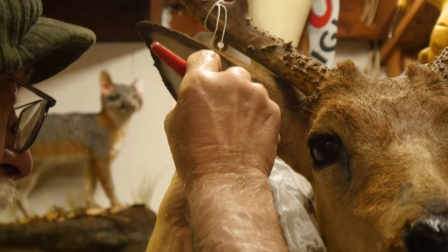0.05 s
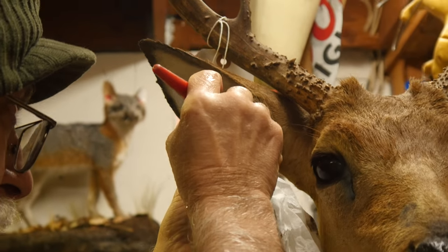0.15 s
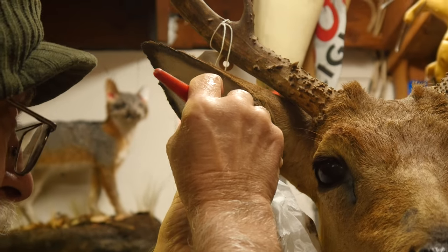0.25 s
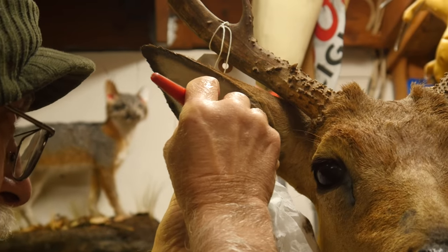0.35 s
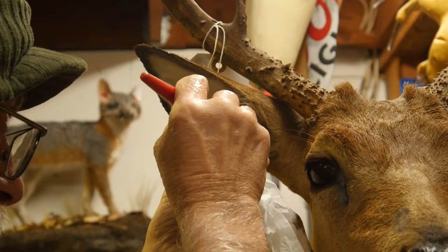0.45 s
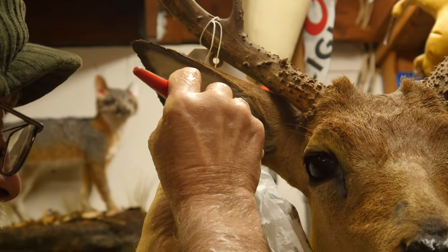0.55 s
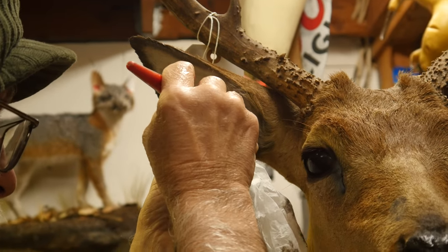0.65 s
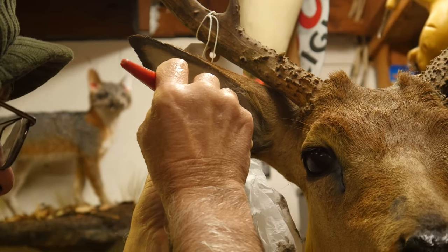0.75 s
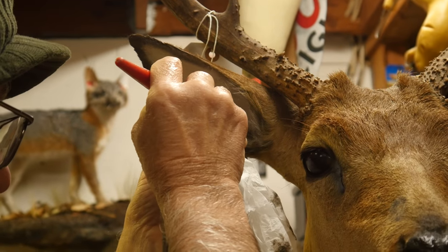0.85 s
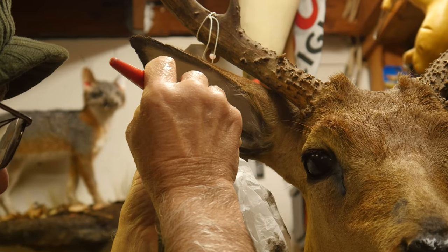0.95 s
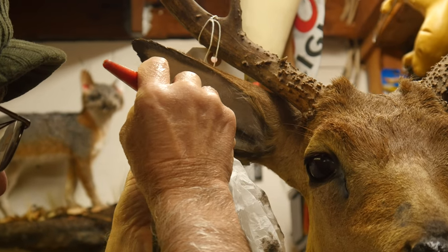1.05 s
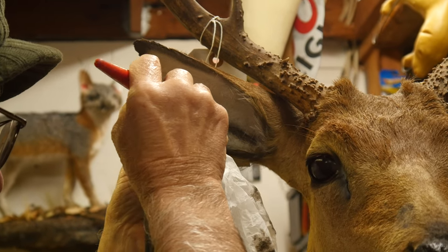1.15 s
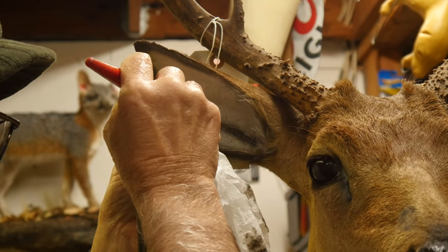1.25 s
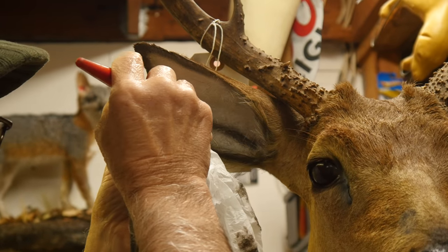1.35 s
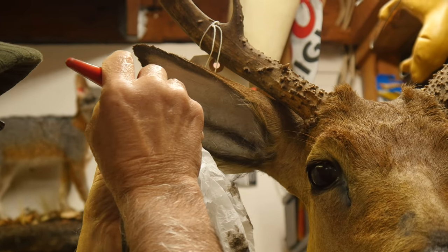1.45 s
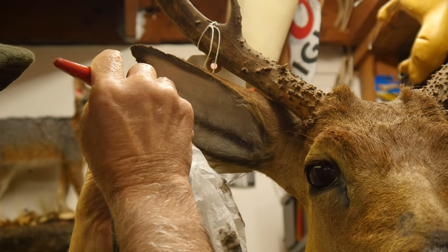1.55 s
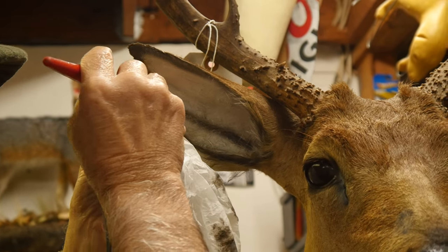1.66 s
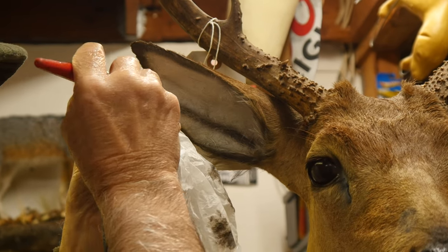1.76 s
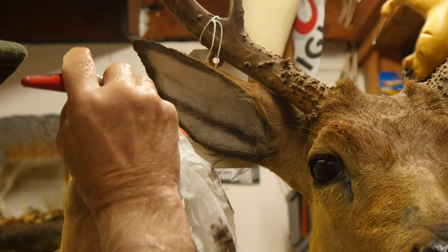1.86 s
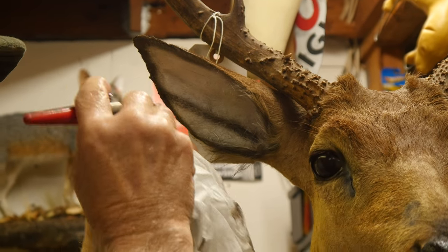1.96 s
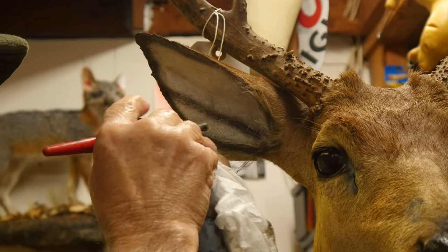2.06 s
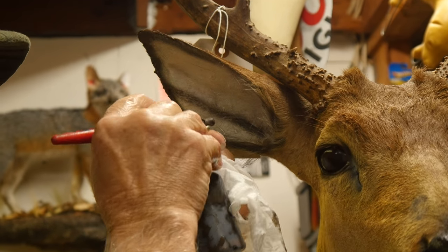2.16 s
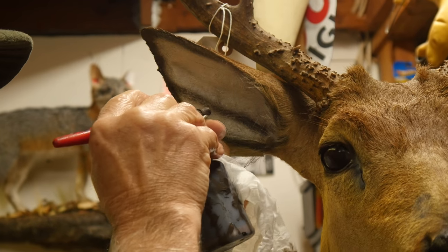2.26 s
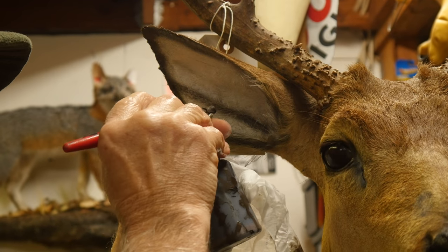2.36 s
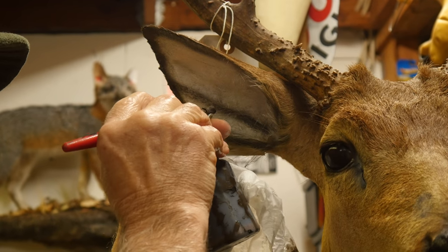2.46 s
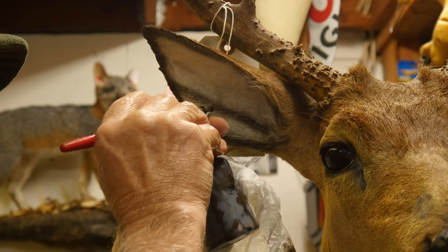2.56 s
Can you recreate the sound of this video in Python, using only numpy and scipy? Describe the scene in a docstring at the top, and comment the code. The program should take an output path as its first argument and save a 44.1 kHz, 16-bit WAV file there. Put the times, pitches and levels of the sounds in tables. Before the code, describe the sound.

Close in a small quiet workshop with faint hum, an airbrush sprays a mounted deer's ear. Soft low bumps come first, then at 0.15 seconds a bright sizzling hiss opens with a faint whistle. It runs steadily, shifting colour around 1.2, swelling to a breathy roar at 1.5-1.75, and cuts off by 1.8. Quiet rustle and tiny ticks follow at 2.0-2.45; spraying restarts abruptly near 2.58.

```python
"""A small, quiet workshop: an airbrush sprays paint on the ear of a mounted deer.
Shaped noise hisses at the nozzle while the trigger is down, with moving sizzle bands and a faint whistle.
The jet's rush crossfades between noise colours along the ear, and roars once it reaches the hollow.
In the pause the hand shifts its grip: rustle, ticks and a faint hum of sines; then the next burst starts."""
import sys
import numpy as np
from scipy import signal
from scipy.fft import rfft, irfft
from scipy.io import wavfile

SR = 44100
rng = np.random.default_rng(int(sys.argv[2]) if len(sys.argv) > 2 else 0)


def wrap_up_sound(samples):
    """Save the sound to the file named by the first command line argument, as 16-bit audio."""
    columns = np.atleast_2d(samples).T
    # keep every value between -1 and 1, then stretch to whole-number steps
    tamed = np.clip(columns, -1, 1)
    steps = np.round(tamed * 32767).astype(np.int16)
    wavfile.write(sys.argv[1], SR, steps)


N = 114660
TIME = np.arange(N) / SR
HZ = np.maximum(np.fft.rfftfreq(N, 1 / SR), 1)


def from_db(db):
    """Decibels to amplitude gain."""
    return 10 ** (np.asarray(db) / 20)


def rms_one(x):
    """Scale to unit power."""
    return x / np.sqrt(np.mean(x ** 2) + 1e-20)


def in_time(rows):
    """Control curve at every sample, linear between (time, value) rows."""
    return np.interp(TIME, *np.transpose(rows))


def noise(colour):
    """Gaussian noise at rms 1, its spectrum interpolated in dB over log frequency."""
    hz, db = np.transpose(colour)
    gain = from_db(np.interp(np.log(HZ), np.log(hz), db))
    return rms_one(irfft(rfft(rng.standard_normal(N)) * gain, N))


def drift(rate_hz):
    """Low-passed Gaussian noise at rms 1, 6 dB down at rate_hz."""
    lowpass = 1 / (1 + (HZ / rate_hz) ** 2)
    return rms_one(irfft(rfft(rng.standard_normal(N)) * lowpass, N))


def touches(rows, colour, decay_s):
    """Each touch is a puff of noise that starts at once and dies exponentially."""
    envelope = np.zeros(N)
    for start_s, level_db in rows:
        decay = np.exp(-np.abs(TIME - start_s) / decay_s)
        envelope += from_db(level_db) * (TIME >= start_s) * decay
    return noise(colour) * envelope


def resonance(rows, width_hz):
    """Air noise in a narrow band: two slow noises on quadrature carriers, centre and level moving."""
    time_s, centre_hz, level_db = np.transpose(rows)
    phase = 2 * np.pi * np.cumsum(np.interp(TIME, time_s, centre_hz)) / SR
    band = drift(width_hz / 2) * np.cos(phase) + drift(width_hz / 2) * np.sin(phase)
    return band * from_db(np.interp(TIME, time_s, level_db))


# spectrum of the still room's air: (frequency [Hz], relative density [dB])
ROOM_AIR_COLOUR = [(12, 7), (25, -3.5), (45, -17), (150, -14.5), (450, -19), (700, -21), (1000, -23),
                   (3300, -27), (5000, -28.5), (8000, -29), (15000, -26)]
ROOM_AIR_DB = -55.5


def room_air():
    """Steady noise of the still room, strongest in the bass."""
    return from_db(ROOM_AIR_DB) * noise(ROOM_AIR_COLOUR)


# mains hum partials: (frequency [Hz], rms level [dB])
HUM_PARTIALS = [(60, -79), (120, -75), (360, -75.5), (479.5, -68.5), (720, -79)]


def mains_hum():
    """Steady sines, each with a random phase."""
    hum = np.zeros(N)
    for hz, rms_db in HUM_PARTIALS:
        hum += np.sqrt(2) * from_db(rms_db) * np.sin(2 * np.pi * (hz * TIME + rng.random()))
    return hum


# spectrum of the reverberant tail: (frequency [Hz], relative level [dB])
TAIL_COLOUR = [(200, 0.5), (900, -4), (2000, 2.5), (3500, -1), (5000, 1), (10000, -5.5), (16000, -4.5)]
ROOM_T60_S, ROOM_GAP_S, ROOM_DB = 0.24, 0.0048, -12


def workshop(x):
    """Adds a short, slightly dull tail of dense reflections: decaying noise after a short gap."""
    tail = noise(TAIL_COLOUR) * from_db(-60 * TIME / ROOM_T60_S) * (TIME > ROOM_GAP_S)
    unit_tail = tail / np.linalg.norm(tail)
    return x + from_db(ROOM_DB) * signal.fftconvolve(x, unit_tail)[:N]


# soft handling bumps: (time [s], onset level [dB])
BUMP_ONSETS = [(.034, -54), (.045, -45.5), (.083, -52), (.11, -56), (.14, -58)]
# spectrum of a bump: (frequency [Hz], relative density [dB])
BUMP_SPECTRUM = [(40, -11), (130, -1.5), (220, -5), (330, 1), (420, -34), (1500, -58)]
BUMP_DECAY_S = 0.02


def bumps():
    """Dull low puffs as the hand handles the tool."""
    return touches(BUMP_ONSETS, BUMP_SPECTRUM, BUMP_DECAY_S)


# rustle of the shifting grip: (time [s], level [dB])
RUSTLE_LEVEL = [(0, -60), (.16, -59.5), (1.87, -56.5), (1.96, -57.5), (2.02, -52.5), (2.085, -53),
                (2.11, -62), (2.16, -56.5), (2.18, -56), (2.21, -62), (2.29, -64.5), (2.32, -57.5),
                (2.43, -61.5), (2.47, -67), (2.57, -63)]
# spectrum of rustle and ticks: (frequency [Hz], relative density [dB])
GRIP_COLOUR = [(250, -13), (700, -6), (1300, -4.5), (2000, -1), (2700, -5.5), (3400, 3), (4300, -8),
               (6500, -16), (15000, -40.5)]
RUSTLE_GRAIN_DB, RUSTLE_GRAIN_HZ = 2, 220


def rustle():
    """Mid-band friction noise of the hand, grainy through fast random level changes."""
    grain_db = RUSTLE_GRAIN_DB * drift(RUSTLE_GRAIN_HZ)
    return noise(GRIP_COLOUR) * from_db(in_time(RUSTLE_LEVEL) + grain_db)


# small ticks of the grip: (time [s], onset level [dB])
TICK_ONSETS = [(2.183, -44.5), (2.347, -46), (2.384, -50), (2.429, -48), (2.4425, -40)]
TICK_DECAY_S = 0.0012


def ticks():
    """Very short puffs in the rustle's colour."""
    return touches(TICK_ONSETS, GRIP_COLOUR, TICK_DECAY_S)


# whistle as the valve cracks open: (time [s], centre [Hz], level [dB])
VALVE_WHISTLE = [(.04, 1410, -80), (.095, 1410, -63), (.15, 1412, -63), (.2, 1415, -44.5), (.25, 1415, -85)]
WHISTLE_WIDTH_HZ = 18


def valve_whistle():
    """Faint near-tone: air noise in a very narrow band."""
    return resonance(VALVE_WHISTLE, WHISTLE_WIDTH_HZ)


# sizzle of the jet as the tip is turned, both: (time [s], centre [Hz], level [dB])
UPPER_SIZZLE = [(.15, 14400, -76), (.19, 14400, -40), (.38, 14200, -45), (.47, 13300, -39),
                (.72, 13000, -49), (.765, 14900, -37), (.91, 13800, -34), (1.0, 14000, -46),
                (1.1, 15400, -43), (1.2, 15400, -41), (1.35, 15400, -41), (1.5, 15550, -30),
                (1.63, 15500, -29), (1.75, 15000, -33), (1.8, 15000, -85)]
LOWER_SIZZLE = [(.15, 8100, -75), (.19, 8000, -50), (.4, 8240, -48), (.5, 8100, -43), (.7, 8100, -45),
                (.85, 8250, -60), (1.05, 7960, -41), (1.19, 7800, -51), (1.23, 11000, -44),
                (1.38, 11000, -46), (1.5, 11200, -35), (1.74, 11170, -43), (1.79, 11200, -85)]
UPPER_SIZZLE_WIDTH_HZ, LOWER_SIZZLE_WIDTH_HZ = 1900, 340


def sizzle():
    """Two treble bands of air noise that move in pitch and level."""
    upper = resonance(UPPER_SIZZLE, UPPER_SIZZLE_WIDTH_HZ)
    return upper + resonance(LOWER_SIZZLE, LOWER_SIZZLE_WIDTH_HZ)


FLUTTER_HZ = 58.7  # shared by nozzle and jet
# hiss as the trigger is worked: (time [s], level [dB])
HISS_LEVEL = [(.14, -69), (.172, -40), (.195, -34.5), (.41, -30.5), (.474, -28.5), (.70, -31),
              (.916, -29.5), (.955, -29.5), (1.19, -30), (1.215, -25), (1.65, -29), (1.748, -29),
              (1.785, -41), (1.82, -97), (2.578, -57), (2.592, -27)]
# spectrum of the nozzle: (frequency [Hz], relative density [dB])
NOZZLE_COLOUR = [(800, -33), (3000, -50), (5500, -7), (6600, -6), (7500, -4.5), (8900, -3.5), (10000, 0.5),
                 (11200, 2), (12500, 2), (13500, 3), (14400, 1), (15800, 0.5)]
HISS_FLUTTER_DB = 0.46


def nozzle():
    """Smooth bright turbulence of air leaving the tip, with slight level flutter."""
    flutter_db = HISS_FLUTTER_DB * drift(FLUTTER_HZ)
    return noise(NOZZLE_COLOUR) * from_db(in_time(HISS_LEVEL) + flutter_db)


# buffeting as the jet swirls in the cup of the ear: (time [s], level [dB])
BUFFET_LEVEL = [(1.05, -67), (1.19, -49), (1.255, -43.5), (1.39, -48), (1.5, -37), (1.6, -42.5),
                (1.68, -50), (1.765, -45.5), (1.79, -89)]
# spectrum of the buffeting: (frequency [Hz], relative density [dB])
BUFFET_SPECTRUM = [(110, -20), (200, -9.5), (300, 0.5), (500, 2), (790, 11), (1050, 1.5), (2000, -13),
                   (5000, -50)]


def buffeting():
    """Low turbulence, peaked near 800 Hz."""
    return noise(BUFFET_SPECTRUM) * from_db(in_time(BUFFET_LEVEL))


# jet striking the surface: (time [s], level [dB])
RUSH_LEVEL = [(.145, -67), (.185, -42), (.262, -29), (.325, -27.5), (.385, -31.5), (.43, -31), (.485, -28),
              (.73, -32.5), (.87, -30), (1.195, -29.5), (1.25, -27), (1.43, -27), (1.52, -22),
              (1.67, -17.5), (1.71, -19.5), (1.757, -21), (1.78, -39), (1.8, -74), (2.58, -87),
              (2.593, -36.5)]
# where the jet points: (time [s], place [index: 0 rim, 1 flat, 2 fold, 3 and above hollow])
JET_AIM = [(.33, 0), (.55, 0.48), (.8, 1), (1.19, 1.17), (1.225, 1.84), (1.42, 2), (1.5, 2.7), (1.62, 3),
           (1.8, 4), (2.55, 1.5)]
# spectrum of the rush at each place: (frequency [Hz], relative density [dB])
RIM_COLOUR = [(150, -45), (400, -23.5), (700, -16.5), (1100, -6), (1650, 0.5), (2050, -4), (2800, -5),
              (3200, 4), (3750, -7.5), (4400, -5.5), (5300, -15), (6400, -46), (12000, -40)]
FLAT_COLOUR = [(150, -29.5), (400, -17.5), (700, -16.5), (1150, -2.5), (1550, -0.5), (1900, -7),
               (2900, 0.5), (3800, 1.5), (4500, 2.5), (5300, -1), (6300, -10), (8000, -4.5), (12000, -14.5)]
FOLD_COLOUR = [(150, -32), (400, -14), (700, -15), (1050, -2), (1450, 0), (1900, -7.5), (2400, -2),
               (2900, 2), (3700, -1.5), (4400, -5), (5500, -8), (6600, -7), (8200, -10), (12000, -20)]
HOLLOW_COLOUR = [(120, -47), (300, -23.5), (550, -23), (800, -12.5), (1400, -3.5), (1900, -9), (2250, -3.5),
                 (2950, 0), (3600, -2), (4100, -9.5), (4700, -14), (7000, -16), (12000, -22.5)]
RUSH_FLUTTER_DB = 0.88


def jet_on_ear():
    """Fluttering turbulence, coloured by the part of the ear that the jet strikes, over buffeting."""
    colours = (RIM_COLOUR, FLAT_COLOUR, FOLD_COLOUR, HOLLOW_COLOUR)
    aim = np.clip(in_time(JET_AIM), 0, len(colours) - 1)
    rush = np.zeros(N)
    for place, colour in enumerate(colours):
        share = np.clip(1 - np.abs(aim - place), 0, 1)
        rush += noise(colour) * np.sqrt(share)  # equal-power crossfade
    flutter = from_db(RUSH_FLUTTER_DB * drift(FLUTTER_HZ))
    return (rush * from_db(in_time(RUSH_LEVEL)) + buffeting()) * flutter


def scene():
    """Tool and hand sound in the room; air and hum are added dry. Both channels are the same."""
    hand = bumps() + rustle() + ticks()
    airbrush = valve_whistle() + sizzle() + nozzle() + jet_on_ear()
    mono = room_air() + mains_hum() + workshop(hand + airbrush)
    return np.array([mono, mono])


CUTOFF_HZ = 15850


def record(dry):
    """Steep linear-phase low-pass at the top of the treble."""
    lowpass = signal.firwin(401, CUTOFF_HZ, fs=SR, window="blackman")
    return signal.fftconvolve(dry, lowpass[None], "same", axes=1)


dry = scene()
out = record(dry)
wrap_up_sound(out)
```